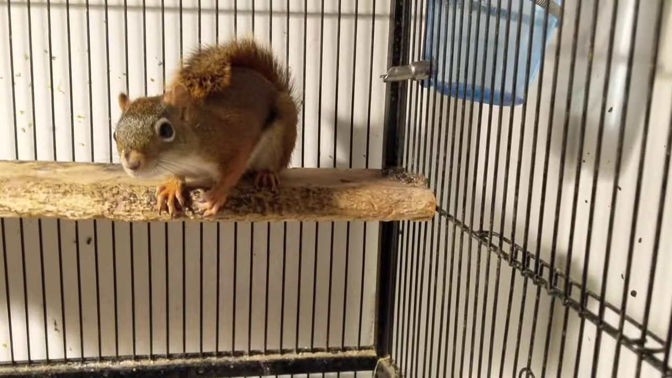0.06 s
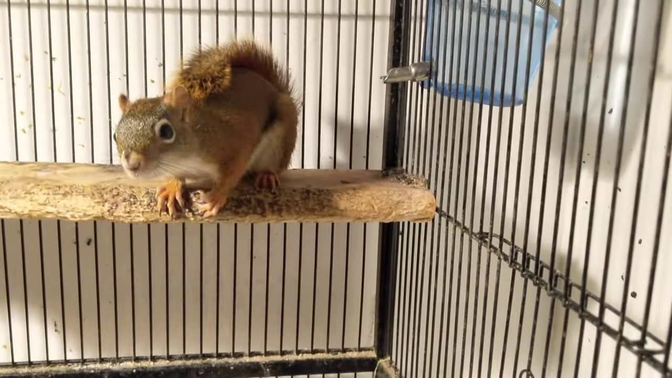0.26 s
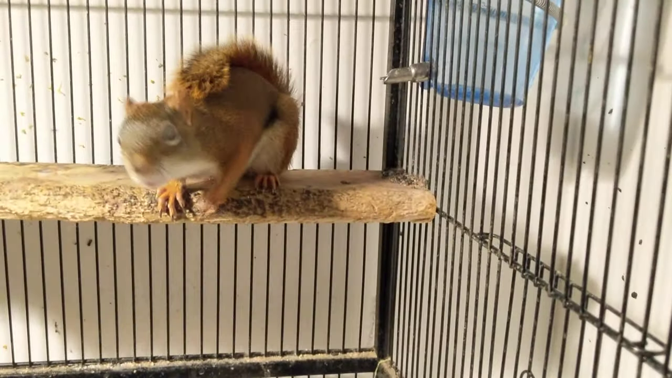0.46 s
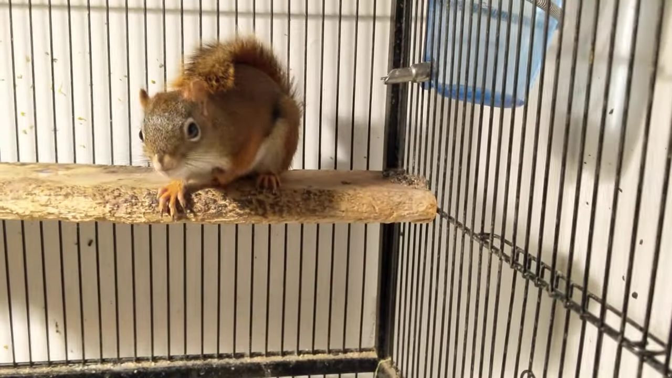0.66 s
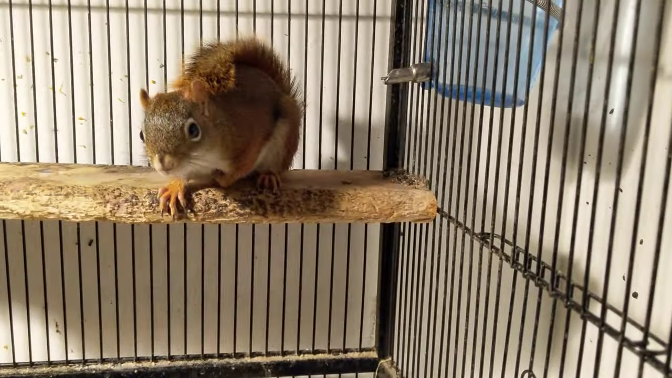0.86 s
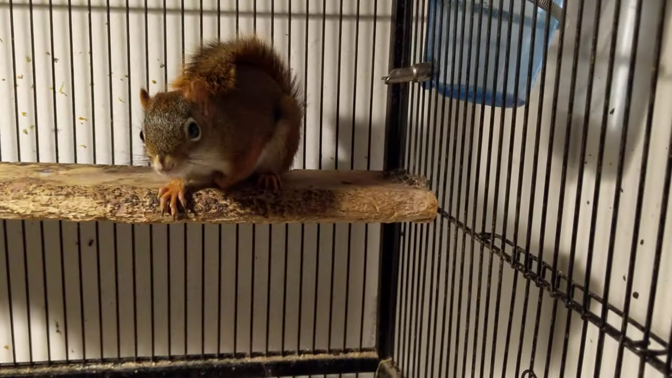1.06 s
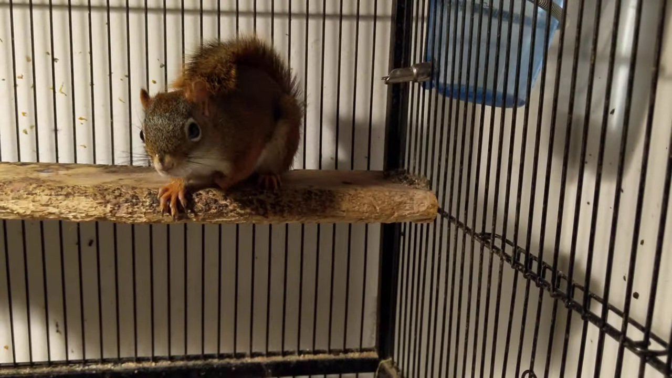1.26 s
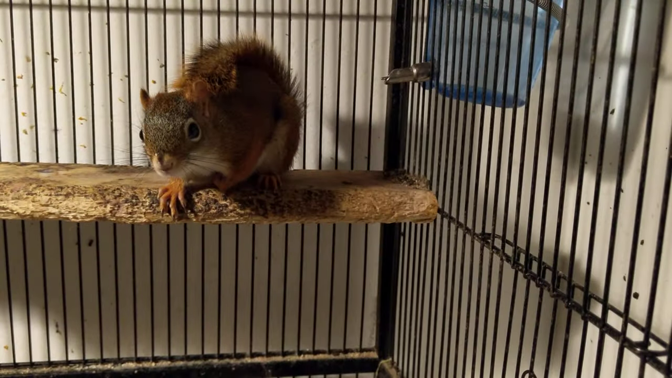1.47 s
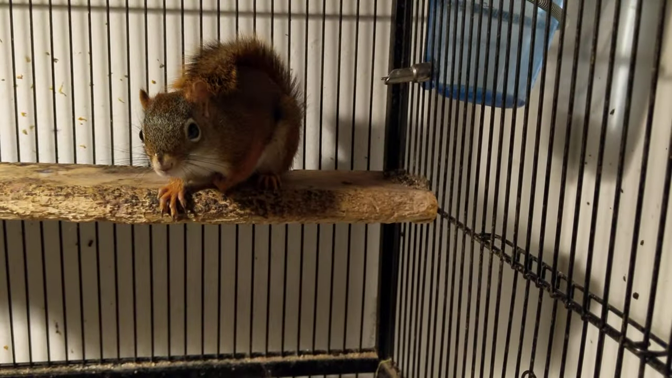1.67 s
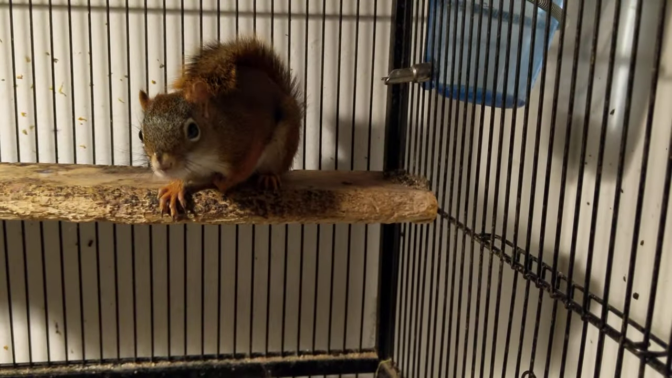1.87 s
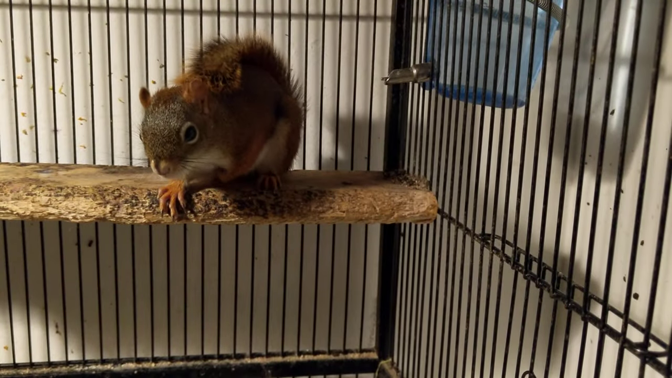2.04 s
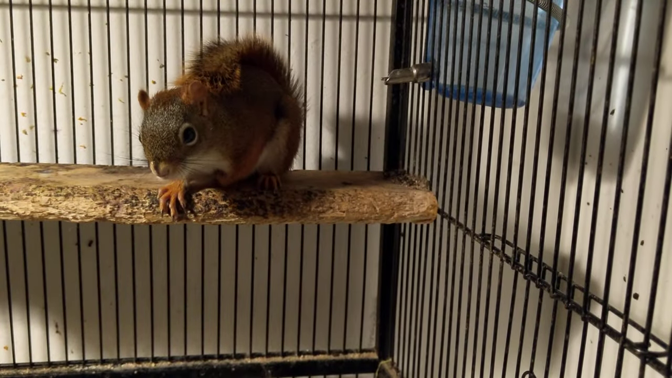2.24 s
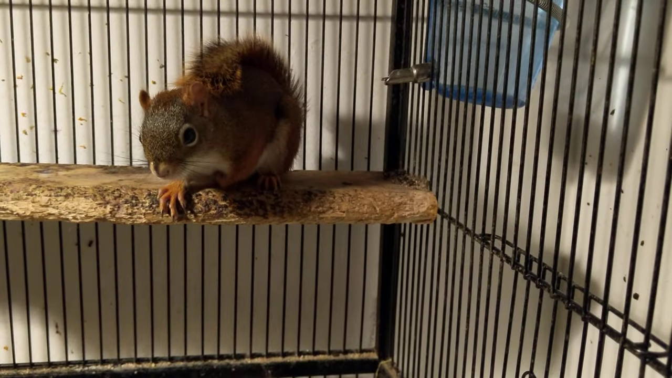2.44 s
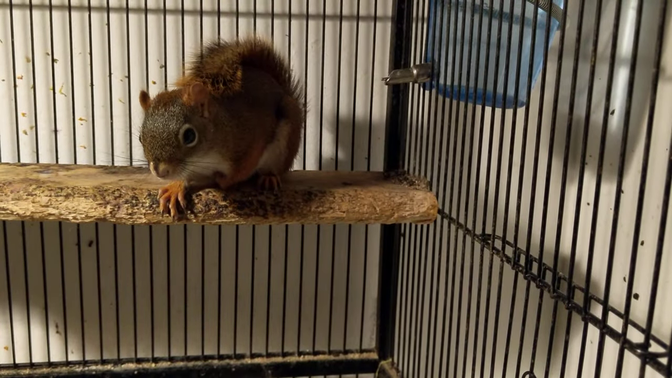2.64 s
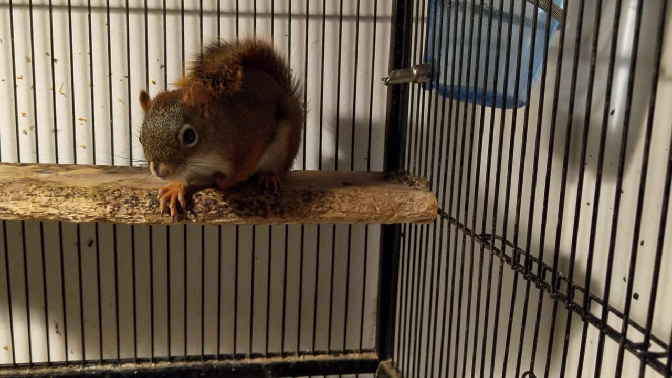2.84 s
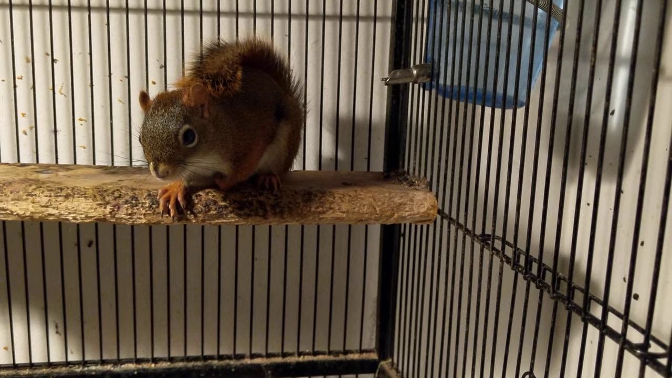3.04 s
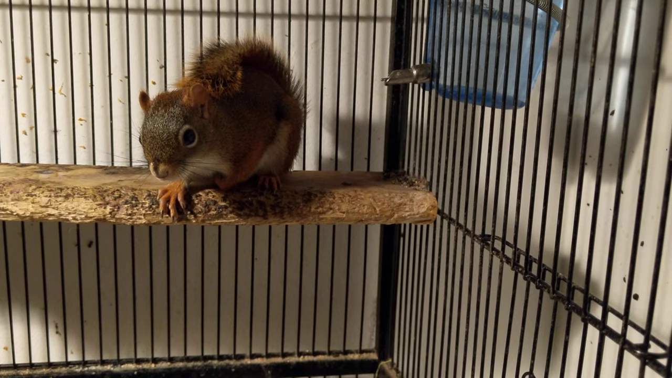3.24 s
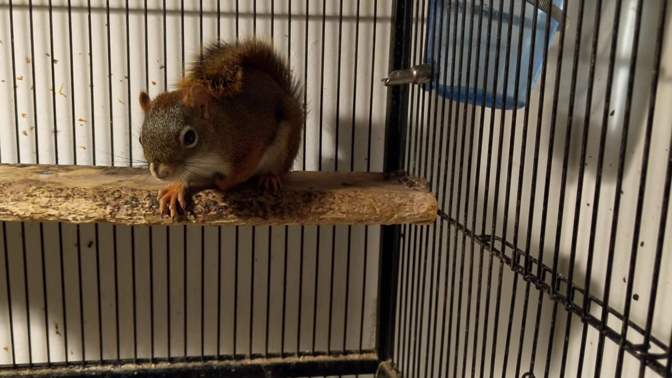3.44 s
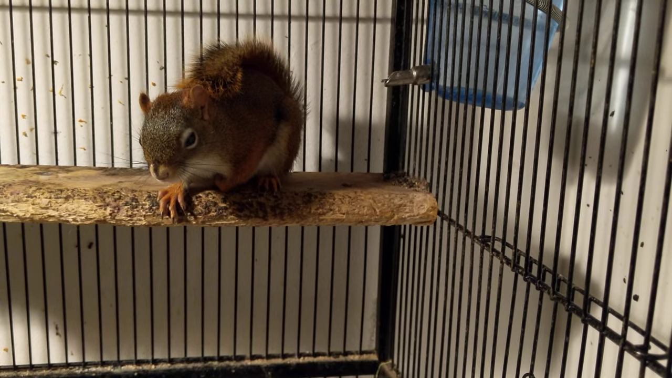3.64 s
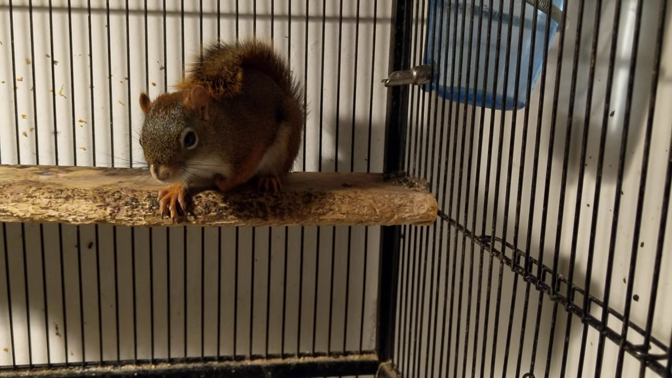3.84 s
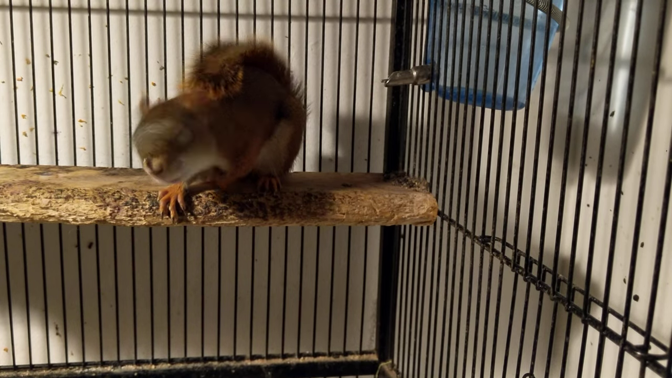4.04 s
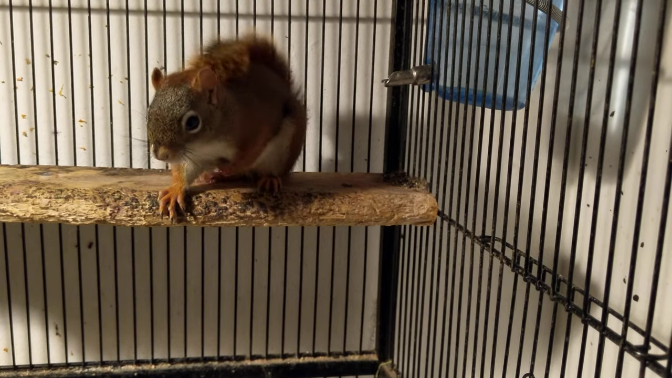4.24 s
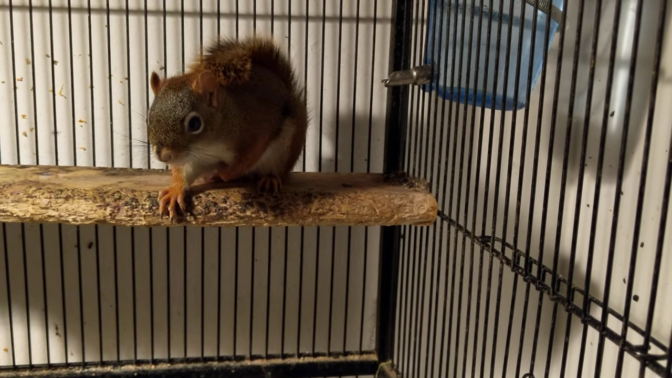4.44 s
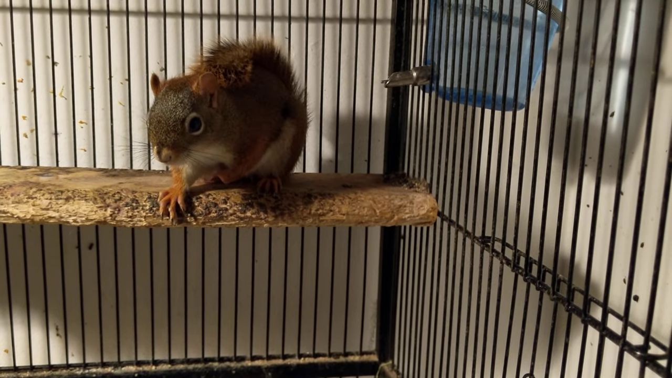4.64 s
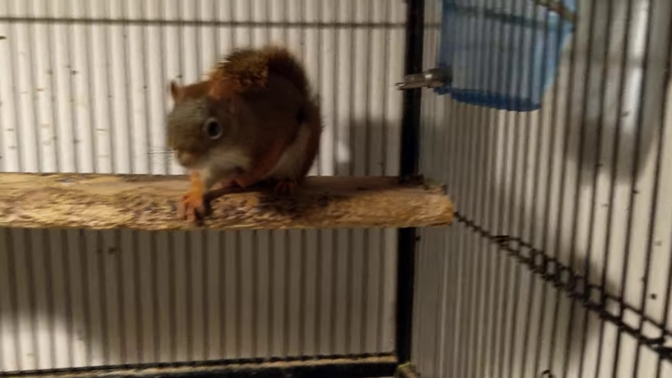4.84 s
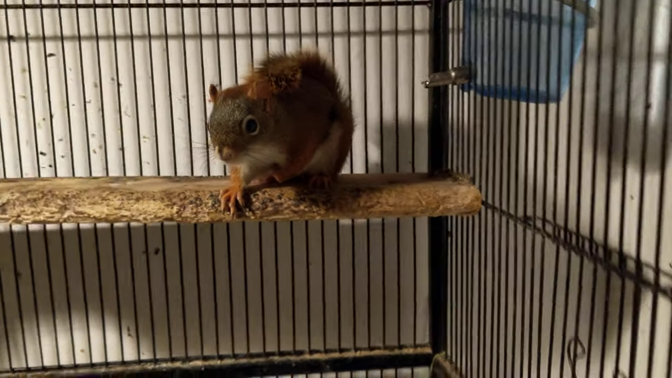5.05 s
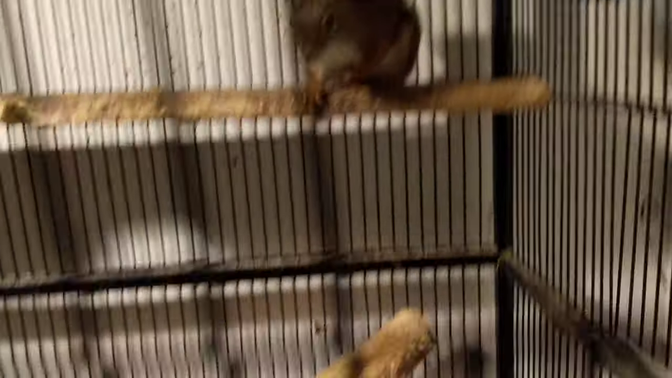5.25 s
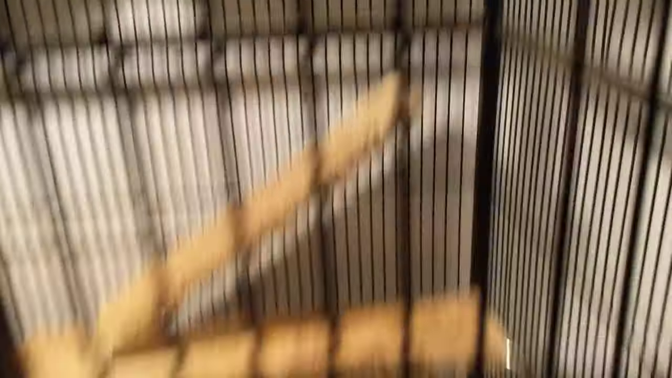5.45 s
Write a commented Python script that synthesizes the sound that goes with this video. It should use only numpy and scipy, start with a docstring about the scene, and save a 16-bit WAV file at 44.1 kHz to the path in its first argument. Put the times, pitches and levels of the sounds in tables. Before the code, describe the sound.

A dull finger bump on the camera comes just before the first of three very short, piercing squirrel barks, heard close with a brief indoor reflection. Long quiet gaps hold only low hum, hiss, tiny scratches and soft brushes. Finally the handheld camera swings away with rubbing noise, and thin metal bars rattle brightly and ring out.

```python
"""A quiet room with soft air noise and a faint hum; then a young red squirrel barks three times in a wire cage.
Each call is a mouth click, a thin arched whistle (a nearly pure tone) and a break into a rough, rising bark
(harmonics and noise ringing in the throat). Small ticks of claws and wire, brushes of hand and sleeve (shaped
noise) and bumps on the camera body (dying tones) are heard too.
At the end the camera swings away with a rustle, and knocks make the cage wires clatter and ring."""
import sys
import numpy as np
from scipy import signal
from scipy.fft import rfft, irfft
from scipy.io import wavfile
from scipy.ndimage import uniform_filter1d, minimum_filter1d

SR = 44100
rng = np.random.default_rng(int(sys.argv[2]) if len(sys.argv) > 2 else 0)


def pcm_store(signal):
    """Save signal as 16-bit PCM."""
    levels = np.round(np.clip(np.atleast_2d(signal), -1, 1) * 32767)
    wavfile.write(sys.argv[1], SR, levels.astype(np.int16).T)


N = 242717  # length in samples

# In all tables t60 is the time a sound takes to fade by 60 dB.
# colour of the room air: (f/Hz, relative level/dB); AIR_DB is its overall level
AIR_COLOUR = [(25, -26), (50, -8), (100, -9), (135, -9.5), (240, -4), (320, -10.5), (480, -12), (800, -17),
              (1600, -21), (4000, -27), (6500, -28), (7400, -25), (8400, -33.5), (15500, -30.5)]
AIR_DB = -59.5
# steady lines in the hum of an appliance: (f/Hz, level/dB before wavering)
HUM_LINES = [(97, -72.5), (241, -68), (295, -69.5), (360.5, -71.5), (480, -78.5)]

# single echoes from the perch, tray and wall: (delay t/s, gain as a factor, negative = flipped)
ECHOES = [(.0021, 0.1), (.0037, -0.088), (.0056, 0.1), (.0083, -0.16), (0.0114, .12), (0.0148, -0.083)]
# how long the room's tail lasts at each frequency: (f/Hz, t60/s)
ROOM_T60 = [(200, 0.21), (2000, 0.24), (5000, .36), (7300, 0.31), (9000, 0.083), (15000, 0.067)]
# the mouth beams its treble forward, so less reaches the walls; shapes all scattered echoes: (f/Hz, level/dB)
ROOM_SHARE = [(300, -3), (2000, -1), (3300, 4), (4600, 5.5), (5600, -4.5), (6400, -3.5), (7500, -5),
              (9500, -1.5), (11500, -5), (15000, -4)]

# a finger bumps the camera body: (t/s, peak level/dB, ring length as a factor)
BUMPS = [(.3423, -23, 0.59), (2.587, -38.5, 2.01)]
# tones of the camera body: (f/Hz, relative level/dB, t60/s before the ring factor)
BUMP_MODES = [(128, -21, 0.047), (465, -4.5, 0.019), (870, 7.5, 0.00294), (1390, 1.5, 0.00795),
              (1970, -21, 0.0058), (4140, -16, 0.0054), (7040, -18, .003)]

# colour of the rubbing noise: (f/Hz, relative level/dB per Hz)
RUSTLE_COLOUR = [(120, -35), (200, -4), (244, 4.5), (263, -23), (288, -7), (596, -1.5), (874, -9.5),
                 (1330, -4), (2020, -7.5), (6020, -9), (9140, -19.5), (13200, -23), (15500, -21)]
# brief brushes of the hand and sleeve: (middle t/s, half length/s, level/dB)
BRUSHES = [(0.184, .05, -62.5), (2.467, 0.028, -59.5), (4.915, 0.13, -59.5)]
# the last brush squeaks faintly
SQUEAK_HZ, SQUEAK_DB = 2676, -63
# the camera swings away: its rustle starts at once, grows to a top and eases off
SWING_S, SWING_TOP_S, SWING_ATTACK_S, SWING_DB = 5.079, 5.29, 0.0045, -47
SWING_GROW_DB_PER_S, SWING_EASE_DB_PER_S = 34.5, 27

# faint ticks of claws and wire: (t/s, peak level/dB before a shared trim, centre f/Hz)
TICKS = [(1.0994, -48, 7200), (1.3493, -49, 5460), (1.5294, -46.5, 2164), (1.6222, -49, 7060),
         (1.6661, -47, 5710), (1.7554, -48.5, 5570), (2.8229, -51, 7340), (3.0944, -50, 2590),
         (3.5167, -48, 2163), (3.6101, -50, 6570)]
# knocks on the cage: (t/s, peak level/dB)
KNOCKS = [(5.08, -53), (5.1706, -42.5), (5.289, -42), (5.3635, -21), (5.371, -29), (5.419, -26.5),
          (5.481, -39)]
# ringing tones of the wires: (f/Hz, relative level/dB, t60/s)
WIRES = [(1810, -18, 0.25), (2220, -29.5, 0.82), (3120, -10, 0.26), (4135, -11.5, 0.077),
         (5800, -20.5, 0.13), (5850, -29, 0.089), (6450, -23, 0.13), (6800, -27.5, 0.11),
         (7320, 7.5, 0.065), (7580, -1.5, 0.15), (7970, -13.5, 0.14), (10800, -9.5, 0.091),
         (12900, -4, 0.084)]
# colour of the wire-on-wire clatter: (f/Hz, relative level/dB per Hz)
CLATTER_COLOUR = [(120, -38.5), (200, -36), (742, -15.5), (1480, -11), (1620, -12.5), (1810, -1),
                  (2850, -7.5), (3180, -2.5), (5490, -1.5), (7090, 10), (8820, -18), (10200, 1),
                  (15500, -13)]
# single bars that ring on after a knock: (t/s, f/Hz, starting level/dB, t60/s)
PINGS = [(5.081, 2300, -58, 0.76), (5.368, 1877, -49.5, 0.38), (5.484, 2000, -46, 0.185)]

# the whistle that opens each call: (t/s, length/s, pitch f/Hz before arch and scoop,
# arch as a share of the pitch, level/dB at the top of the arch before flutter,
# rasp level/dB relative to the tone, opening click peak level/dB)
WHISTLES = [(0.4437, 0.035, 5368, .016, -18, -21.5, -30), (1.8898, 0.037, 5490, 0.0393, -15, -30.5, -44.5),
            (4.0229, 0.036, 5610, 0.049, -11.5, -31.5, -32)]
# colour of the rasp under the whistle: (f/Hz, relative level/dB)
RASP_COLOUR = [(300, -22), (1200, -13), (2800, -10.5), (3700, -10.5), (4800, 5), (6200, -1), (7700, -1.5),
               (10000, -9.5), (12000, -12), (15500, -23)]
# the voice starts low and faint, then catches
SCOOP_S, CATCH_S, SCOOP_SHARE, SCOOP_DB = 0.0026, .001, .13, -22
# pitch and level rise and fall in one arch; after it the tone holds on more weakly
ARCH_S, ARCH_DB, HOLD_DB = .028, 8.5, -4.5

# the bark that each whistle breaks into: (t/s, length/s, pitch f/Hz at CLEAR_S,
# level/dB before swell, droop and tremble, roughness 0-1 at the end of the hold,
# delay of the upward flip/s, flip accent level/dB, breaking click peak level/dB)
BARKS = [(0.4761, 0.039, 1722, -9, 0.23, .040, -0.5, -20.5),
         (1.9271, 0.037, 1864, -10.5, 0.22, .032, 0.5, -28),
         (4.0592, 0.038, 1812, -12, 0.3, .025, 6, -31.5)]
# resonances of the throat and mouth: (f/Hz, relative level/dB)
THROAT = [(100, -38.5), (500, -26.5), (1000, -23), (1300, -21.5), (1800, -11.5), (2300, -16.5), (2800, -11),
          (3500, -15.5), (4300, -25.5), (5400, -11.5), (6300, 1.5), (7400, 1.5), (8300, -14), (9200, -16),
          (10000, -25.5), (11500, -16), (13500, -32), (15500, -21)]
# the pitch leaps up from below, passes the bark's pitch at CLEAR_S and climbs on to a ceiling
LEAP_SHARE, LEAP_S, CLEAR_S, CLIMB_HZ_PER_S, CEILING_HZ = .44, .005, .0135, 18000, 2116
# once in each bark the voice flips briefly upward
FLIP_HZ, FLIP_S = 464, .004
# the level swells, droops while it is held, then is cut off
BARK_ONSET_DB, BARK_ATTACK_S, DROOP_DB_PER_S = -10.5, .009, -130
RELEASE_DB, RELEASE_S = -20.5, 0.013
# roughness 0-1: harsh at the break, clearest at CLEAR_S, breathy as it dies
ROUGH_BREAK, ROUGH_CLEAR, ROUGH_END = .72, .12, 0.69

# ringing tones of a mouth click: (f/Hz, relative level/dB, t60/s before the ring factor)
CLICK_MODES = [(610, -14, .009), (1087, 0.5, 0.024), (1510, -3.5, .007), (1780, -1, 0.012),
               (3080, -15.5, 0.0034), (6904, -13.5, 0.0092), (8610, -13, 0.0018)]
# the mouth clicks open just before the whistle
CLICK_LEAD_S = 0.0093
# how long the mouth rings, as a factor: on opening and as the bark breaks
OPEN_RING, BREAK_RING = 1.15, 0.82

EDGE_HZ = 15900  # the treble is cut above this


def amp(db):
    """Turns decibels into a plain gain factor."""
    return 10 ** (np.asarray(db) / 20)


def evened(x):
    """Scales a sound to an rms (average strength) of 1."""
    return x / np.sqrt(np.mean(x ** 2) + 1e-20)


def read(points, hz):
    """Reads a table's value at hz, on a log-frequency axis."""
    f, value = np.transpose(points)
    return np.interp(np.log(hz + 1), np.log(f + 1), value)


def add(mix, s, sound):
    """Adds a sound into the mix from time s on."""
    part = mix[max(round(s * SR), 0):][:len(sound)]
    part += sound[:len(part)]


def noise(spectrum, size):
    """Noise of rms 1 with the given spectrum."""
    white = rfft(rng.standard_normal(size))
    gain = amp(read(spectrum, np.fft.rfftfreq(size, 1 / SR)))
    return evened(irfft(white * gain, size))


def wander(rate_hz, size):
    """Smooth random movement of rms 1, with little above rate_hz."""
    hz = np.fft.rfftfreq(size, 1 / SR)
    keep_slow = np.exp(-(hz / rate_hz) ** 2) * (hz > 0)
    return evened(irfft(rfft(rng.standard_normal(size)) * keep_slow, size))


def swell(middle_s, half_s):
    """A gain that rises and falls like a bell."""
    return np.exp(-((np.arange(N) / SR - middle_s) / half_s) ** 2)


def background(waver=.3, drift_hz=1.5):
    """Room air as shaped noise, plus an appliance's lines that waver in level and drift in pitch."""
    hum = np.zeros(N)
    for hz, db in HUM_LINES:
        level = amp(db) * (1 + waver * wander(5.5, N)) * np.sqrt(2)  # sqrt(2): level is rms
        phase = 2 * np.pi * np.cumsum(hz + drift_hz * wander(3.4, N)) / SR
        hum += level * np.sin(phase)
    return amp(AIR_DB) * noise(AIR_COLOUR, N) + hum


def room(x, near_db=-9.5, tail_db=-21, near_t60=.17):
    """Single echoes and a quick scatter from the cage corner, then the small room's tail."""
    size = SR * 3 // 4
    t = np.arange(size) / SR
    # sparse random reflections, about 4000 a second, after a 4 ms gap
    signs = rng.choice([-1., 1.], (2, size))
    present = (rng.random((2, size)) < 4000 / SR) * (np.arange(size) > .004 * SR)
    far_taps, near_taps = signs * present
    # each frequency of the tail fades at its own pace
    hz, frame_s, z = signal.stft(far_taps, SR, nperseg=256)
    tail_fade = amp(-60 * frame_s / read(ROOM_T60, hz)[:, None])
    tail = signal.istft(z * tail_fade, SR, nperseg=256)[1][:size]
    near = near_taps * amp(-60 * t / near_t60)
    response = amp(tail_db) * tail / np.linalg.norm(tail)
    response += amp(near_db) * near / np.linalg.norm(near)
    share = amp(read(ROOM_SHARE, np.fft.rfftfreq(size, 1 / SR)))
    response = irfft(rfft(response) * share, size)
    for s, gain in ECHOES:
        add(response, s, np.array([gain]))
    return x + signal.fftconvolve(x, response)[:N]


def rustle(patch_db=2.5, squeak_width_hz=150):
    """Patchy rubbing: brief brushes, a squeak in the last one, then the camera's swing."""
    t = np.arange(N) / SR
    # random louder and softer patches in time and frequency
    z = signal.stft(noise(RUSTLE_COLOUR, N), nperseg=256)[2]
    patches = uniform_filter1d(rng.standard_normal(z.shape), size=4, axis=0)
    patches = evened(uniform_filter1d(patches, size=9, axis=1))
    rub = evened(signal.istft(z * amp(patch_db * patches), nperseg=256)[1][:N])

    growing_db = SWING_GROW_DB_PER_S * (SWING_TOP_S - t)
    easing_db = SWING_EASE_DB_PER_S * (t - SWING_TOP_S)
    below_top_db = np.maximum(growing_db, easing_db)
    attack = np.clip((t - SWING_S) / SWING_ATTACK_S, 0, 1)
    swing = attack * amp(SWING_DB - below_top_db)
    brushes = sum(amp(db) * swell(s, half) for s, half, db in BRUSHES)

    # a narrow band of noise around the squeak's pitch
    phase = 2 * np.pi * SQUEAK_HZ * t
    squeak = wander(squeak_width_hz, N) * np.sin(phase) + wander(squeak_width_hz, N) * np.cos(phase)
    last_s, last_half, _ = BRUSHES[-1]
    return rub * (swing + brushes) + amp(SQUEAK_DB) * swell(last_s, last_half) * squeak


def pops(rows, modes):
    """Dull, quickly damped pops; neighbouring modes swing in opposite directions."""
    out, t = np.zeros(N), np.arange(SR // 10) / SR
    for s, peak_db, ring in rows:
        pop = np.zeros(len(t))
        for k, (hz, db, t60) in enumerate(modes):
            fade = amp(db - 60 * t / (t60 * ring))
            pop += (-1) ** k * fade * np.sin(2 * np.pi * hz * t)
        add(out, s, amp(peak_db) * pop / abs(pop).max())
    return out


def camera_bumps():
    """A finger's bump sets the camera body ringing briefly."""
    return pops(BUMPS, BUMP_MODES)


def ticks(trim_db=-3, skirt_db=-14):
    """Tiny scratches of fast-fading noise around one frequency, as the animal shifts its grip."""
    out, t = np.zeros(N), np.arange(SR // 10) / SR
    fade = amp(-60 * t / .04)  # t60 of 0.04 s
    for s, peak_db, hz in TICKS:
        colour = [(hz / 2, skirt_db), (hz, 0), (hz * 2, 2 * skirt_db)]
        tick = noise(colour, len(t)) * fade
        add(out, s, amp(peak_db + trim_db) * tick / abs(tick).max())
    return out


def cage(clatter_t60=0.21, ring_db=-5, rise_s=0.00057):
    """Each knock is a short clatter of wire on wire that leaves the bars ringing."""
    out, t = np.zeros(N), np.arange(SR // 2) / SR
    for s, peak_db in KNOCKS:
        ring = np.zeros(len(t))
        for hz, db, t60 in WIRES:
            ring += amp(db - 60 * t / t60) * np.sin(2 * np.pi * (hz * t + rng.random()))
        clatter = noise(CLATTER_COLOUR, len(t)) * amp(-60 * t / clatter_t60)
        hit = (clatter + amp(ring_db) * ring) * (1 - np.exp(-t / rise_s))
        add(out, s, amp(peak_db) * hit / abs(hit).max())
    return out


def pings():
    """Single bars each sing a thin, dying note: a fading sine."""
    out, t = np.zeros(N), np.arange(SR // 2) / SR
    for s, hz, db, t60 in PINGS:
        add(out, s, amp(db - 60 * t / t60) * np.sin(2 * np.pi * hz * t))
    return out


def whistle(start, length, pitch_hz, arch_share, level_db, rasp_db, flutter_db=2.5, octave_db=-20):
    """A nearly pure, fluttering tone with a weak octave and a trace of rasp; returns its start too."""
    t = np.arange(-SCOOP_S, length, 1 / SR)
    size = len(t)
    arch = np.sin(np.pi * np.clip(t / ARCH_S, 0, 1))
    scoop = np.clip(1 - t / CATCH_S, 0, 1)
    hz = pitch_hz * (1 + arch_share * arch - SCOOP_SHARE * scoop)
    off_arch_db = np.where(t < ARCH_S / 2, -ARCH_DB, HOLD_DB)
    db = level_db + (1 - arch) * off_arch_db + SCOOP_DB * scoop
    jitter = .005 * wander(600, size)
    phase = 2 * np.pi * np.cumsum(hz * (1 + jitter)) / SR
    tone = evened(np.sin(phase) + amp(octave_db) * np.sin(2 * phase))
    tone = tone + amp(rasp_db) * noise(RASP_COLOUR, size)
    level = amp(db + flutter_db * wander(170, size))
    return start - SCOOP_S, level * tone * signal.windows.tukey(size, .08)


def throat(x):
    """Rings x through the throat; the phase lag follows from the gain, as in any passive cavity."""
    size = 8192
    log_gain = np.log(amp(read(THROAT, abs(np.fft.fftfreq(size, 1 / SR)))))
    taps = np.fft.ifft(np.exp(np.conj(signal.hilbert(log_gain)))).real[:size // 8]
    return evened(signal.fftconvolve(x, taps)[:len(x)])


def bark_gesture(length, pitch_hz, level_db, held_rough, flip_delay, accent_db, tremble_db=1.5):
    """Pitch, level and roughness through one bark."""
    t = np.arange(0, length + RELEASE_S, 1 / SR)
    climb = np.minimum(pitch_hz + CLIMB_HZ_PER_S * (t - CLEAR_S), CEILING_HZ)
    leap = 1 - LEAP_SHARE * np.exp(-(t / LEAP_S) ** 2)
    flip = np.exp(-((t - flip_delay) / FLIP_S) ** 2)
    hz = climb * leap + FLIP_HZ * flip

    attack = np.minimum(t / BARK_ATTACK_S, 1)
    release = np.maximum(t - length, 0) / RELEASE_S
    db = level_db + BARK_ONSET_DB * (1 - attack) + RELEASE_DB * release
    db = db + DROOP_DB_PER_S * np.maximum(t - CLEAR_S, 0)
    db = db + accent_db * flip + tremble_db * wander(300, len(t))

    rough = np.interp(t, [0, CLEAR_S, length, t[-1]], [ROUGH_BREAK, ROUGH_CLEAR, held_rough, ROUGH_END])
    return hz, db, np.clip(rough, 0, 1)


def bark(pitch_hz, db, rough, jitter=0.16, shimmer=1.0, rasp=0.919, soft_hz=10500, scatter=.15):
    """The folds slap irregularly; their harmonics sweep up through the throat's main resonance."""
    size = len(db)
    hz = pitch_hz * (1 + jitter * rough * wander(700, size))
    # each slap lands a little early or late, which smears the upper harmonics into noise
    phase = 2 * np.pi * np.cumsum(hz) / SR + scatter * np.sqrt(rough) * wander(2010, size)
    k = np.arange(1, 15)[:, None]  # harmonic numbers
    heights = 1 / (1 + (k * hz / soft_hz) ** 4)
    slaps = (heights * np.cos(k * phase)).sum(0)
    slaps = slaps * (1 + shimmer * rough * wander(760, size))
    # breath noise pulses along with the slaps
    turbulence = rng.standard_normal(size) * (1 + .5 * np.cos(phase))
    voice = np.sqrt(1 - rough ** 2) * throat(slaps) + rasp * rough * throat(turbulence)
    return amp(db) * voice * signal.windows.tukey(size, .05)


def squirrel():
    """Three calls: the mouth clicks open, a whistle sounds, then a click marks the break into a bark."""
    out, clicks = np.zeros(N), []
    for s, *shape, click_db in WHISTLES:
        add(out, *whistle(s, *shape))
        clicks.append((s - CLICK_LEAD_S, click_db, OPEN_RING))
    for s, *shape, click_db in BARKS:
        add(out, s, bark(*bark_gesture(*shape)))
        clicks.append((s, click_db, BREAK_RING))
    return out + pops(clicks, CLICK_MODES)


def scene():
    """Sounds in the cage set the room ringing; those at the camera and the background stay dry."""
    in_cage = squirrel() + ticks() + cage() + pings()
    mix = room(in_cage) + camera_bumps() + rustle() + background()
    return mix[None]


def record(dry, open_db=-42, hold_s=0.394, quiet_db=-4.0):
    """A noise suppressor starts open, reopens for loud sounds and lowers the rest; peaks are rounded off."""
    t = np.arange(N) / SR
    power_db = 10 * np.log10(abs(uniform_filter1d(dry[0] ** 2, size=400)) + 1e-12)
    last_loud = np.maximum.accumulate(t * (power_db > open_db))
    # 0 = open, 1 = shut, with a smooth change between
    shut = uniform_filter1d((t - last_loud > hold_s) * 1., size=900)
    peaks = -minimum_filter1d(-abs(dry[0]), size=64)
    limiter = uniform_filter1d(np.minimum(1, .74 / (peaks + 1e-9)), size=48)
    treble_cut = signal.firwin(511, EDGE_HZ, window=("kaiser", 9), fs=SR)
    return signal.oaconvolve(dry * amp(quiet_db * shut) * limiter, treble_cut[None], "same")


dry = scene()
out = record(dry)
pcm_store(out)
```